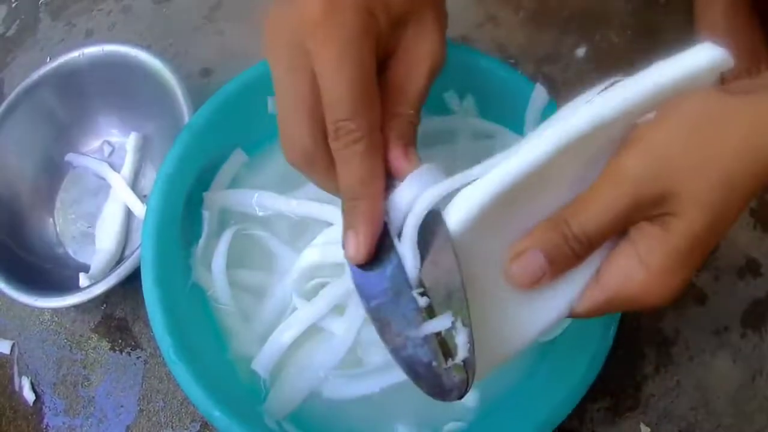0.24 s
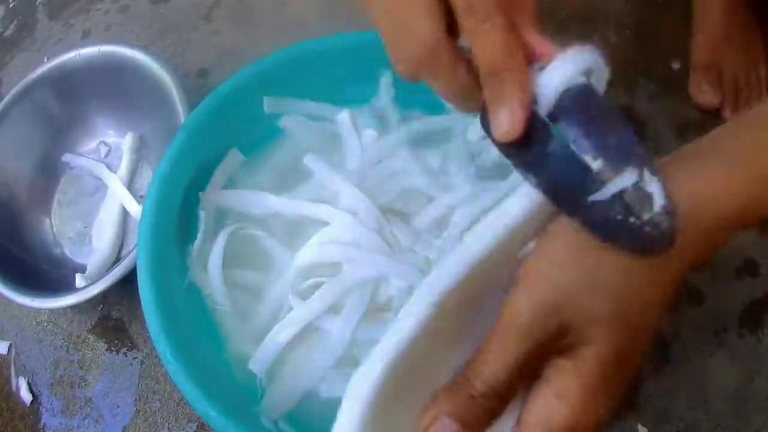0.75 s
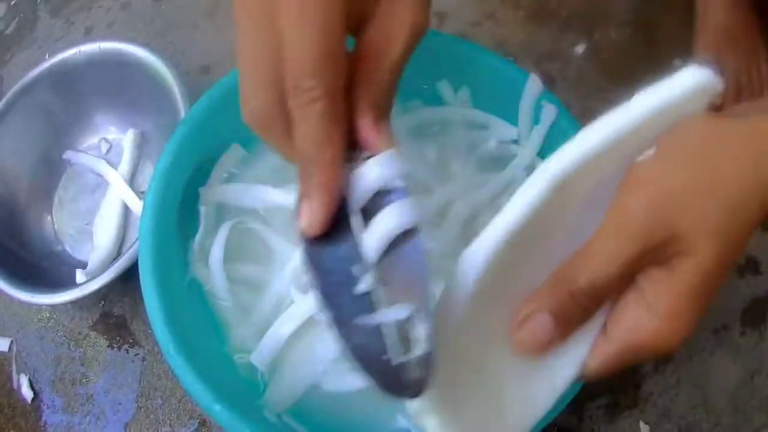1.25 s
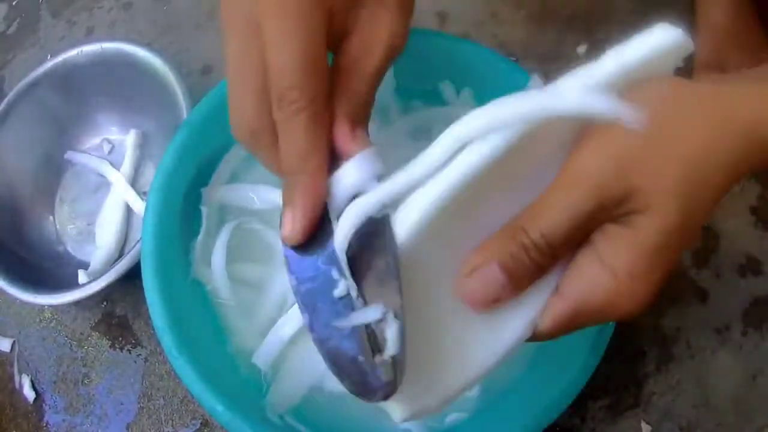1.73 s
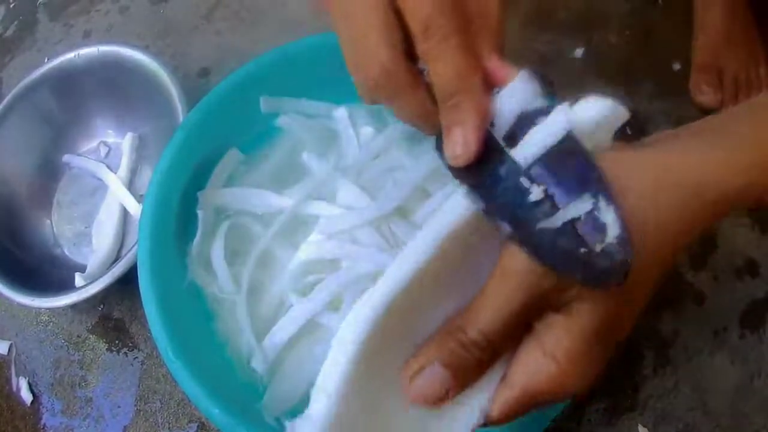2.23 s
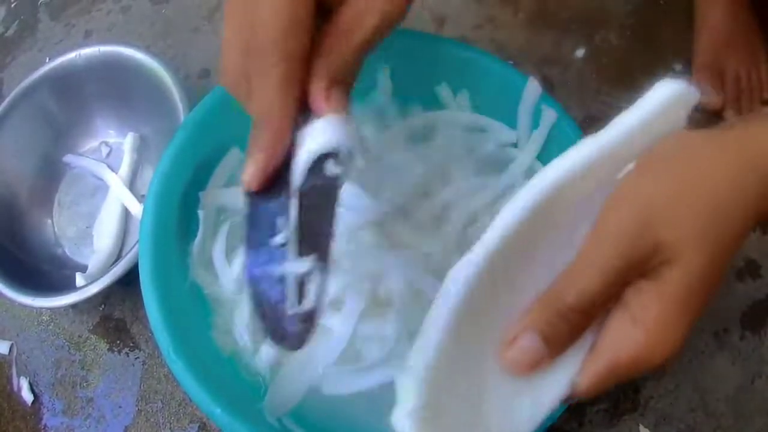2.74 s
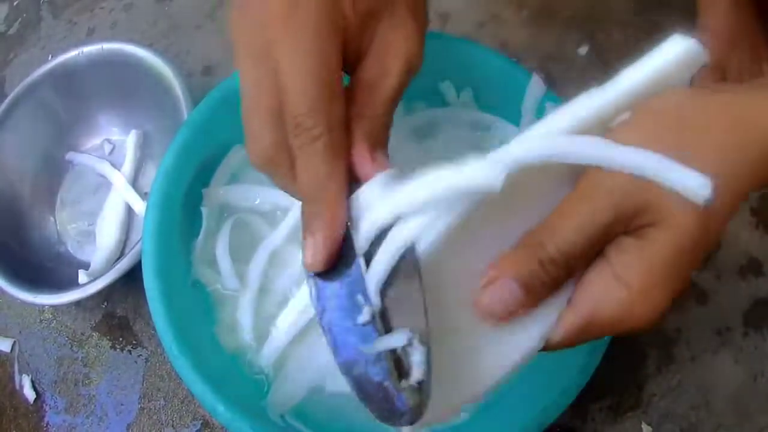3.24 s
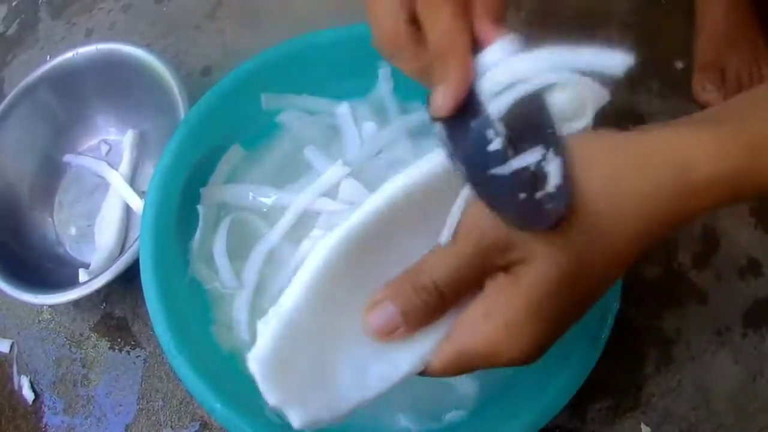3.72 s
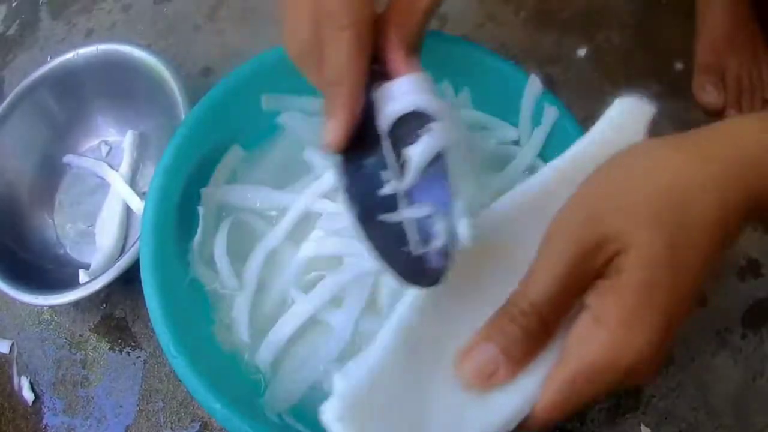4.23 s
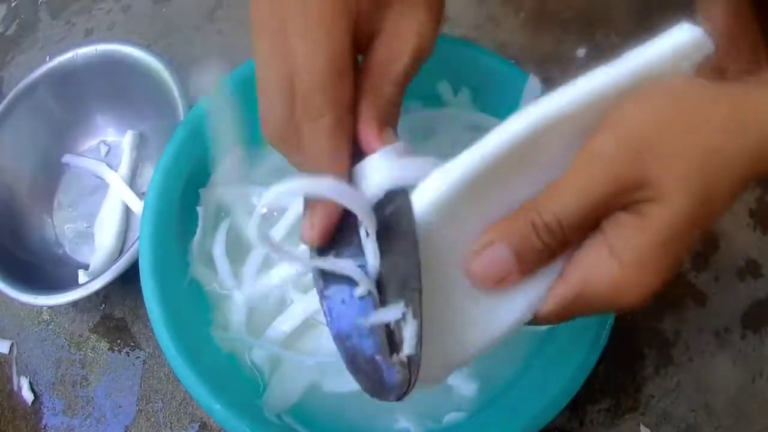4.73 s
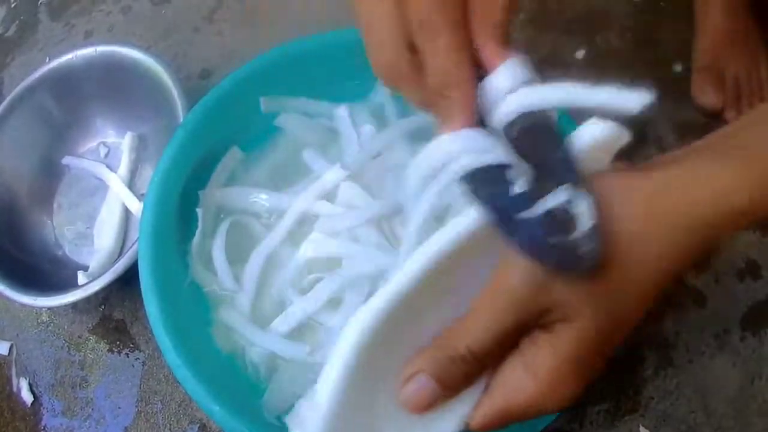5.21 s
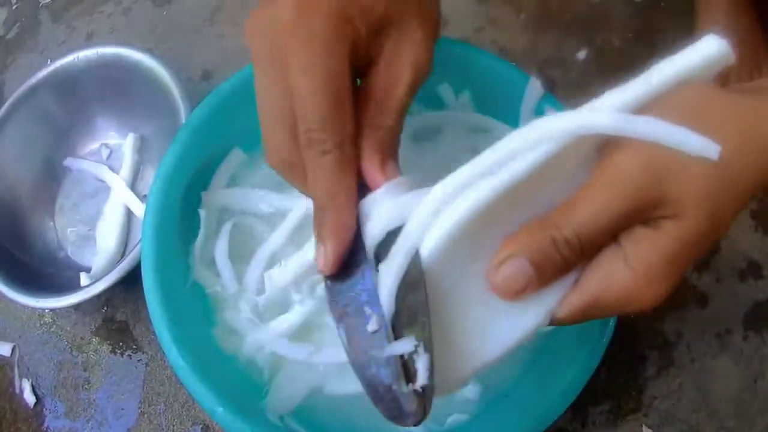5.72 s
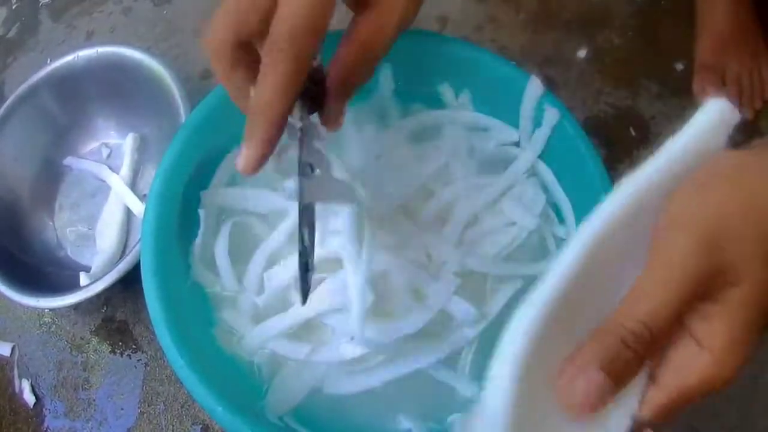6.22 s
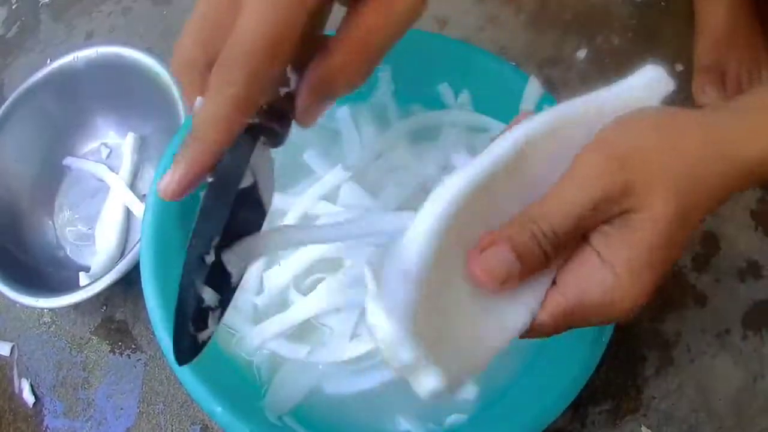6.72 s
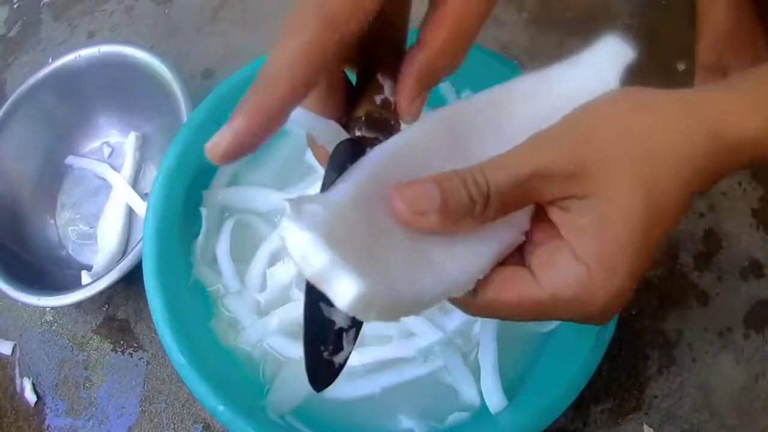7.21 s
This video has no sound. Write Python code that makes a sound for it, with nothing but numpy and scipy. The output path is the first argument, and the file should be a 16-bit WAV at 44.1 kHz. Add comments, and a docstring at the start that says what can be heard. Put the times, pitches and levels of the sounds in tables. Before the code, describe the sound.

A hand peeler cuts strips of fresh coconut in eight short, crisp scrapes, each with a slight metallic ring. Between some strokes the loose blade knocks and wet strips plop into a basin. A distant small bird chirps repeatedly, stopping before the last stroke. A few light rubs and one faint hoot follow. The peeling is close and dry, in a yard with low rumble, hiss and a thin whine.

```python
"""A hand peeler starts cutting fresh coconut meat over a plastic basin in a yard, as a small bird sings.
Each stroke bursts thousands of tiny cells that sound the flesh and ring the blade. After some strokes
the peeler is flicked: its loose blade knocks, then wet strips drop into the basin. The song stops near
five seconds, the eighth stroke follows, and a few light rubs and one faint hoot end the work.
A low rumble, hiss and a thin whine carry on from start to finish."""
import sys
import numpy as np
from scipy import signal
from scipy.fft import rfft, irfft, next_fast_len
from scipy.io import wavfile
from scipy.ndimage import map_coordinates

SR = 44100
rng = np.random.default_rng(int(sys.argv[2]) if len(sys.argv) > 2 else 0)


def unload_audio(sound):
    """Save the sound as a 16-bit wav file, at the path given as the first command line argument."""
    columns = np.transpose(np.atleast_2d(sound))
    # keep every value between -1 and 1, then stretch to whole-number steps
    steps = np.round(np.clip(columns, -1, 1) * 32767)
    wavfile.write(sys.argv[1], SR, steps.astype(np.int16))


N = 329074
TIME = np.arange(N) / SR
TOP_HZ = 15600

# The tone of the flesh, the ringing blade and the crisp fizz: pitch_hz, level_db
FLESH_TONE = [(200, -6), (520, -23), (700, -4), (850, 6.5), (1230, 4.5), (1380, -6), (1500, 1), (1650, -12),
              (1890, 6), (2250, -3.5), (2500, -7), (3300, -10.5), (3700, -22.5), (6000, -62)]
BLADE_TONE = [(2500, -29), (3800, -18.5), (4300, -10), (4650, 2), (5000, -1.5), (5300, 0.5), (5650, -13.5),
              (6500, -15.5), (10000, -42)]
FIZZ_TONE = [(2000, -3.5), (2900, -10.5), (3400, -5.5), (3750, -13.5), (4600, -9), (5900, 3.5),
             (6400, -6.5), (7500, 0), (8700, 1), (9400, -4.5), (10700, -4.5), (12000, -8), (13000, -7.5),
             (15500, -17)]

def scraping():
    """The edge sticks and slips through the flesh; one judder shakes the flesh, blade and fizz."""
    (on_flesh, on_blade, on_fizz), progress = pressing()
    judder = unit(undb(1.2 * walk(130) + 0.82 * walk(62)))
    flesh = colour(cells(per_s=6000, spread_db=2.0), FLESH_TONE)
    flesh = shifting(flesh, depth_db=2.5, width_hz=239, per_s=22)
    blade = colour(cells(per_s=9800, spread_db=2.5), BLADE_TONE)
    blade = shifting(blade, depth_db=2.5, width_hz=160, per_s=18)
    fizz = colour(cells(per_s=16000, spread_db=2.0), FIZZ_TONE)
    fizz = shifting(fizz, depth_db=3.2, width_hz=260, per_s=28)
    fizz = climbing(fizz, progress, start_hz=4300, end_hz=16500, width_oct=0.12, lift_db=3.0)
    mix = on_flesh * flesh * undb(1.9) + on_blade * blade * undb(0.35) + on_fizz * fizz * undb(1.5)
    return judder * mix

# Long cuts, which skid until the edge bites: start_s, length_s, bite_after_s, flesh_db, ring_db, fizz_db
LONG_CUTS = [(0.038, 0.2, 0.058, -53.5, -51.5, -51), (0.866, 0.24, 0.053, -54.5, -52, -55),
             (1.577, 0.25, 0.024, -54, -48.5, -53.5), (2.26, 0.228, .016, -53.5, -47, -52.5),
             (3.084, 0.216, .018, -54, -48, -51), (3.812, 0.21, 0.029, -53.5, -53, -52.5),
             (4.542, 0.24, 0.12, -55, -55, -53.5), (5.438, 0.27, 0.02, -55, -49.5, -53)]
# Short rubs of blade on strip: start_s, length_s, flesh_db, ring_db, fizz_db
SHORT_RUBS = [(0.429, 0.061, -54.5, -56.5, -60), (0.656, 0.02, -57.5, -67, -80),
              (1.15, 0.033, -56.5, -66, -59.5), (1.878, 0.023, -59, -70, -65),
              (2.634, 0.033, -57.5, -67, -54.5), (3.335, .045, -53, -60, -53.5),
              (4.022, 0.029, -58, -65, -63), (4.058, 0.037, -54.5, -64, -57.5),
              (4.831, 0.053, -56, -62.5, -56), (4.995, 0.012, -57, -56, -54.5),
              (5.246, .03, -61.5, -75, -78), (5.722, 0.057, -62, -64.5, -59),
              (5.857, 0.045, -54, -58, -52.5), (5.908, 0.015, -56, -74, -65), (6.712, 0.042, -63, -72, -71)]

def pressing():
    """How hard the edge drives flesh, blade and fizz, and how far along the coconut slab it is."""
    land_s, leave_s, sink_s = 0.017, 0.015, 0.025
    free_ring_s, fade_db_per_s = 0.056, 81  # the blade rings freely, then the growing strip damps it
    flesh, ring, fizz = np.zeros((3, N))
    progress = np.full(N, .45)  # short rubs touch the middle of the slab
    for start, length, bite_s, flesh_db, ring_db, fizz_db in LONG_CUTS:
        t = TIME[:int(length * SR)]
        contact = np.clip(np.minimum(t / land_s, (length - t) / leave_s), 0, 1)
        slow = 1 - np.sin(np.pi * t / length)  # a stroke is slower, so softer, at both ends
        skid = (1 - np.tanh((t - bite_s) / sink_s)) / 2  # 1 on the surface, 0 once dug in
        damping_db = fade_db_per_s * np.maximum(t - bite_s - free_ring_s, 0)
        shallow_db = -14 * skid - 0.5 * np.exp(-t / 0.082)  # fizz builds as the cut deepens
        squeak_db = 3 * np.exp(-((t - bite_s - .014) / 0.009) ** 2)  # the edge catches after biting
        add(flesh, start, contact * undb(flesh_db - 3 * slow))
        add(ring, start, contact * undb(ring_db - 13 * skid + squeak_db - damping_db))
        add(fizz, start, contact * undb(fizz_db + shallow_db - 5 * slow))
        progress[int(start * SR):][:len(t)] = t / length
    for start, length, *levels in SHORT_RUBS:
        for part, db in zip((flesh, ring, fizz), levels):
            add(part, start, undb(db) * swell(length))
    for start, db, slide_s in BLADE_KNOCKS:  # after each knock in flicks(), the blade slides to rest
        add(flesh, start, undb(db - 33) * swell(slide_s))
        add(ring, start, undb(db - 47.5) * swell(slide_s))
    return (flesh, ring, fizz), progress

def cells(per_s, spread_db):
    """Cells burst under the edge as a crowd of tiny clicks of uneven size."""
    bursts = rng.random(N) < per_s / SR
    return bursts * rng.standard_normal(N) * undb(spread_db * rng.standard_normal(N))

def shifting(x, depth_db, width_hz, per_s):
    """As the contact slides and the strip grows, narrow bands of ringing come and go."""
    hz, t, spectrum = signal.stft(x, SR, nperseg=512)
    chance = rng.standard_normal((256, 1024))
    grid = np.meshgrid(hz / width_hz, t * per_s, indexing="ij")
    patches = map_coordinates(chance, grid, order=1, mode="wrap")
    return unit(signal.istft(spectrum * undb(depth_db * unit(patches)), SR)[1][:N])

def climbing(x, progress, start_hz, end_hz, width_oct, lift_db):
    """The uncut part of the slab shortens, so one band of ringing climbs through each stroke."""
    hz, t, spectrum = signal.stft(x, SR, nperseg=256)
    centre_hz = start_hz * (end_hz / start_hz) ** np.interp(t, TIME, progress)
    octaves = np.log2((hz[:, None] + 1) / centre_hz)
    lift = undb(lift_db * np.exp(-(octaves / width_oct) ** 2))
    return unit(signal.istft(spectrum * lift, SR)[1][:N])

# The loose blade knocks in its holder: start_s, level_db, slide_s
BLADE_KNOCKS = [(0.5125, -23.5, 0.042), (1.185, -15.5, 0.047), (2.6806, -14, 0.025), (3.4036, -16.5, 0.041),
                (3.4131, -29, .02), (5.0484, -23, 0.01)]
# Ticks of bare steel: start_s, level_db
STEEL_TICKS = [(1.189, -38.5), (1.2016, -37), (3.414, -40), (3.423, -40.5)]
# How the holder, the hollow of the hand and the steel ring: pitch_hz, level_db, fade_s
HOLDER_RING = [(890, -10, 0.068), (1269, 18, .016), (1474, -22, 0.014), (1850, -1.5, 0.038),
               (2300, -12, 0.025), (2580, -5, 0.016)]
HAND_RING = [(297, 0, 0.037)]
STEEL_RING = [(4920, 5, 0.026), (5270, 0, 0.028), (5600, -4, 0.014)]

def flicks():
    """Shaking a strip free knocks the blade against its holder and leaves the steel ticking."""
    out = np.zeros(N)
    holder = strike(HOLDER_RING, low_hz=676, top_hz=2230)
    hand = undb(-26.5) * strike(HAND_RING, low_hz=150, top_hz=410)
    for start, db, _ in BLADE_KNOCKS:
        add(out, start, undb(db) * (holder + hand))
    for start, db in STEEL_TICKS:
        add(out, start, undb(db) * strike(STEEL_RING, low_hz=2470, top_hz=7100))
    return out

# Thuds and small bounces as strips land; close rows make one plop:
# start_s, level_db, pitch_ratio, splash_db (relative to level_db)
WET_PLOPS = [(0.6575, -35, 1.02, -2), (1.2263, -23.5, 1.2, -10), (1.2353, -24, 2.1, -29),
             (1.2368, -11.5, 1, -18), (1.243, -34, 1.27, -12), (1.2557, -35, 0.86, -12),
             (1.3183, -51, 1.5, 5.5), (3.4192, -30, 1.3, -5.5), (3.4235, -32.5, 0.92, -25),
             (3.4742, -41, 1.5, 7), (5.0213, -40.5, 1.22, -9), (5.03, -49, 1.6, -10),
             (5.2061, -46, 1.4, 7.5)]
# How the heap in the basin rings: pitch_hz, level_db, fade_s
HEAP_RING = [(712, 6.5, 0.051), (788, 24, 0.013), (1050, -10, 0.013), (1890, -3, 0.022), (2290, -24, 0.018)]
# The tone of a splash: pitch_hz, level_db
SPLASH_TONE = [(400, 11), (1200, -33), (2000, 18.5), (2700, 5), (3600, -25), (5200, -5), (9000, -39),
               (15000, -63)]

def plops():
    """Strips land and bounce on the wet heap; every touch is a thud with a very short splash."""
    out, t = np.zeros(N), TIME[:SR // 8]
    burst = np.exp(-t / 0.0048) * (1 - np.exp(-(t / 0.0003) ** 2))
    for start, db, ratio, splash_db in WET_PLOPS:
        splash = colour(rng.standard_normal(len(t)), SPLASH_TONE) * burst
        thud = strike(HEAP_RING, low_hz=615, top_hz=2360, ratio=ratio)
        add(out, start, undb(db) * (thud + undb(splash_db) * splash / 2))
    return out

# The shapes of four bird notes: time_in_note_s, pitch_hz, level_db
RISING_NOTE = [(0, 2000, -14), (.007, 2240, 1), (.028, 2350, -10.5), (.034, 2650, 1), (.045, 3130, 5),
               (.062, 3540, -2.5), (.073, 2950, -10.5), (.084, 2480, 18)]
PIP_NOTE = [(0, 3880, -18), (.008, 3990, 4), (.016, 3935, 5.5), (.032, 3950, -8)]
FALLING_NOTE = [(0, 4730, 5), (.018, 4210, -2.5), (.06, 3640, -13), (.105, 2750, -4)]
HOOT_NOTE = [(0, 1600, -6), (.02, 1620, 2), (.05, 1610, -12)]
# When the notes are sung: start_s, level_db
RISING_CALLS = [(0.106, -54.5), (0.704, -55), (1.032, -55), (1.360, -55.5), (1.677, -55), (2.007, -57.5),
                (3.448, -59), (3.783, -56.5), (4.109, -55.5), (4.452, -57.5), (4.834, -58)]
FALLING_CALLS = [(0.316, -57)]
HOOT_CALLS = [(6.21, -69)]

def birds():
    """Far birds, blurred by echoes: a repeated pip and rising note, one falling note and one hoot."""
    notes = whistle(RISING_NOTE, RISING_CALLS) + whistle(FALLING_NOTE, FALLING_CALLS)
    notes += whistle(HOOT_NOTE, HOOT_CALLS)
    notes = echoes(notes, fade_s=.25, echo_db=8)
    pip_calls = [(start - .111, db - 3) for start, db in RISING_CALLS]  # just before each rising note
    pips = echoes(whistle(PIP_NOTE, pip_calls), fade_s=0.15, echo_db=-0.5)
    return undb(-4.5) * notes + pips

def whistle(note, calls):
    """One slightly wavering bird note, sung at a slightly different pitch each time."""
    times, hz, note_db = np.transpose(note)
    out, t = np.zeros(N), TIME[:int(times[-1] * SR)]
    shape = undb(np.interp(t, times, note_db)) * signal.windows.tukey(len(t), .2)
    for start, db in calls:
        waver = .012 * walk(400)[:len(t)]
        pitch = np.interp(t, times, hz) * (1 + 0.0022 * rng.standard_normal() + waver)
        add(out, start, undb(db) * shape * np.sin(2 * np.pi * np.cumsum(pitch) / SR))
    return out

# The tone of the yard's rumble and hiss: pitch_hz, level_db
YARD_TONE = [(15, -20), (25, -4.5), (45, -7.5), (65, -9), (115, -3.5), (175, -2), (225, -9), (320, -13),
             (950, -15.5), (1500, -19.5), (3200, -26.5), (5200, -27), (8500, -25.5), (15500, -33.5)]

def yard(recorder_flutter_hz=31.29):
    """Distant rumble, hiss and hum; the recorder adds a quick, shallow flutter to their level."""
    air = colour(rng.standard_normal(N), YARD_TONE) * undb(-58.91 + .5 * walk(4.26))
    hum = sum(undb(db + 1.8 * walk(9)) * np.sin(2 * np.pi * hz * TIME + 1.53 * walk(20))
              for hz, db in [(122, -71.5), (185, -68.0)])
    return (air + hum) * undb(1.35 * np.cos(2 * np.pi * recorder_flutter_hz * TIME))

# The high tones of the whine: pitch_hz, level_db
WHINE_TONES = [(4985, -91), (6089, -89), (6202, -90), (6643, -92), (6751, -91), (6982, -90), (7090, -78),
               (7192, -85), (7424, -87), (7531, -84), (8086, -91), (8199, -90), (8301, -92), (8419, -90),
               (8866, -89), (8969, -91), (10072, -89), (10309, -91), (10632, -93), (14180, -92)]

def whine():
    """A thin electronic whine made of many faint, slightly unsteady tones."""
    return sum(undb(db + 1) * np.sqrt(2) * np.sin(2 * np.pi * hz * TIME + .7 * walk(25))
               for hz, db in WHINE_TONES)

def echoes(x, fade_s, echo_db):
    """Add scattered echoes from the yard's walls and ground, falling 60 dB in fade_s."""
    t = TIME[:SR // 2]
    tail = rng.standard_normal(len(t)) * undb(-60 * t / fade_s) * (1 - np.exp(-t / 0.00089))
    return x + undb(echo_db) * signal.fftconvolve(x, tail / np.linalg.norm(tail))[:N]

def strike(tones, low_hz, top_hz, ratio=1):
    """A struck thing rings and fades; a small body gives no bass and a soft hit dulls the treble."""
    t = TIME[:SR // 8]
    ring = sum(undb(db - 60 * t / fade_s) * np.cos(2 * np.pi * hz * ratio * t)
               for hz, db, fade_s in tones)
    ring = signal.sosfilt(signal.butter(5, low_hz, "high", fs=SR, output="sos"), ring)
    ring = signal.sosfilt(signal.butter(8, top_hz, fs=SR, output="sos"), ring)
    return ring / np.abs(ring).max()

def swell(length_s):
    """The rounded rise and fall of a brief touch."""
    return np.sqrt(np.abs(np.sin(np.linspace(0, np.pi, int(length_s * SR)))))

def colour(x, tone):
    """Shape the bass and treble of x with a tone table, at an average strength of 1."""
    hz, db = np.transpose(sorted(tone))
    size = next_fast_len(len(x))
    all_hz = np.maximum(np.fft.rfftfreq(size, 1 / SR), 1)
    gain = undb(np.interp(np.log(all_hz), np.log(hz), db))
    return unit(irfft(rfft(x, size) * gain, size)[:len(x)])

def walk(per_s):
    """A random wobble of typical size 1 that heads for a new value per_s times a second."""
    steps = rng.standard_normal(8192)
    return unit(np.interp(TIME * per_s, np.arange(len(steps)), steps))

def undb(db):
    """Turn decibels into a number to multiply by."""
    return 10 ** (np.asarray(db) / 20)

def unit(x):
    """Scale x to an average strength (rms) of 1."""
    return x / np.sqrt(np.mean(x ** 2))

def add(out, start_s, x):
    """Mix x into out at start_s."""
    i = max(int(start_s * SR), 0)
    out[i:i + len(x)] += x[:N - i]

def scene():
    """The peeling is close, with little echo; the birds, yard and whine lie behind it."""
    peeling = echoes(scraping() + flicks() + plops(), fade_s=0.071, echo_db=-17)
    return (peeling + birds() + yard() + whine())[None]

def record(dry):
    """Cut the highest treble and shift the wave slightly below zero."""
    return signal.sosfilt(signal.ellip(10, .2, 70, TOP_HZ, fs=SR, output="sos"), dry) - .0111

dry = scene()
out = record(dry)
unload_audio(out)
```